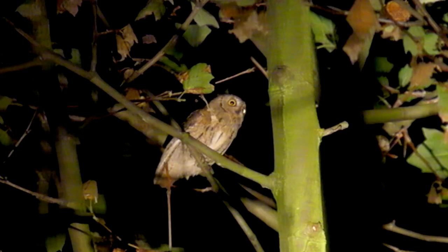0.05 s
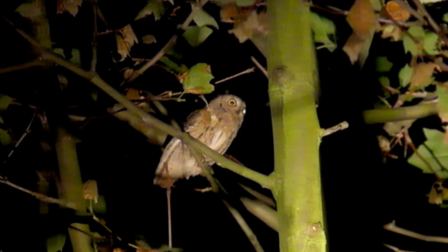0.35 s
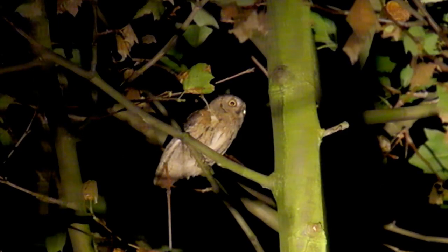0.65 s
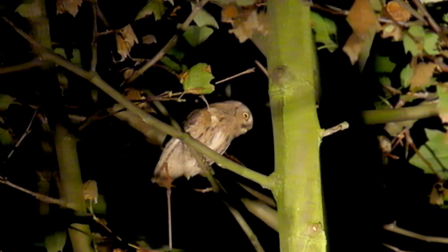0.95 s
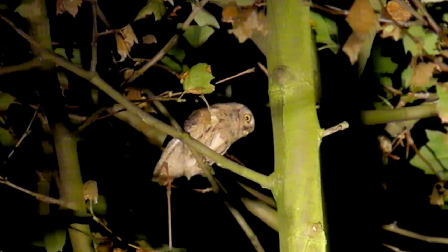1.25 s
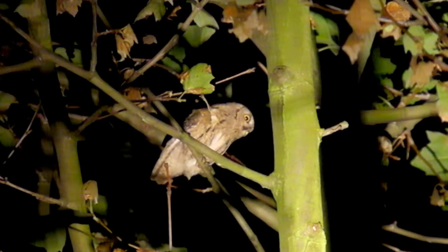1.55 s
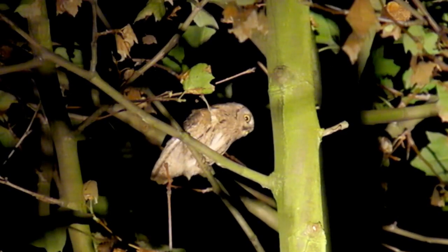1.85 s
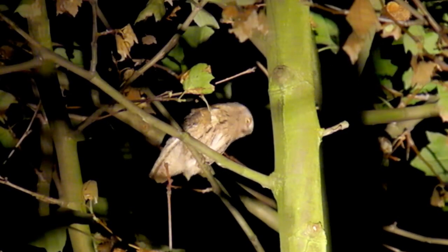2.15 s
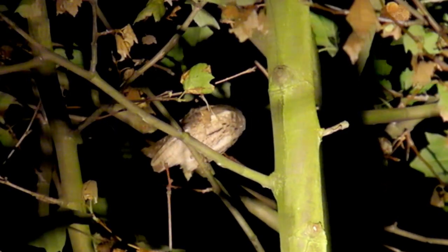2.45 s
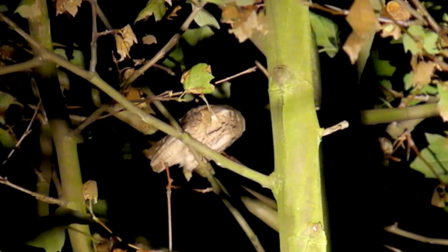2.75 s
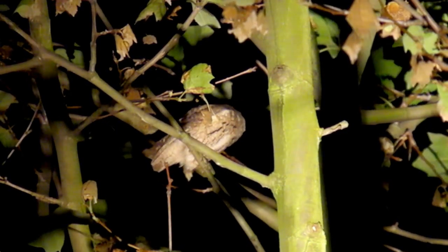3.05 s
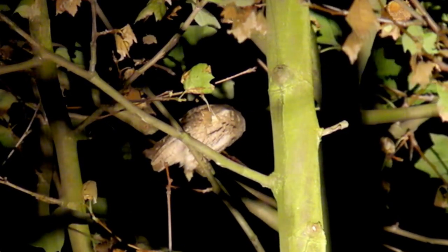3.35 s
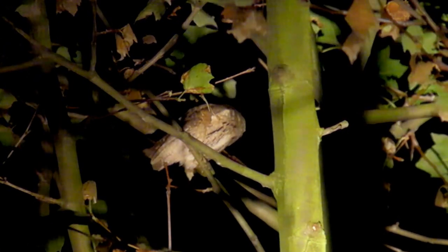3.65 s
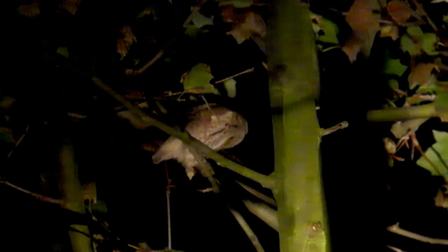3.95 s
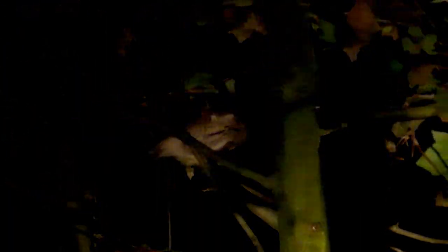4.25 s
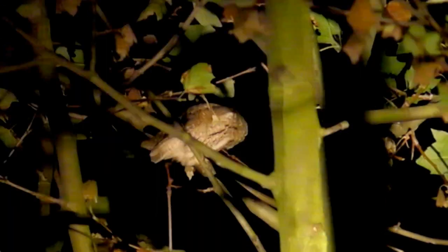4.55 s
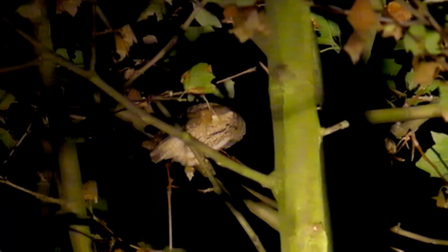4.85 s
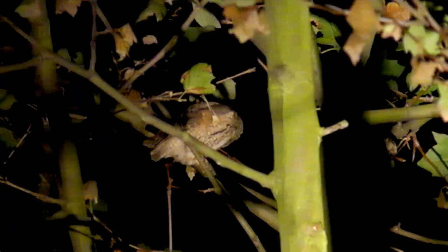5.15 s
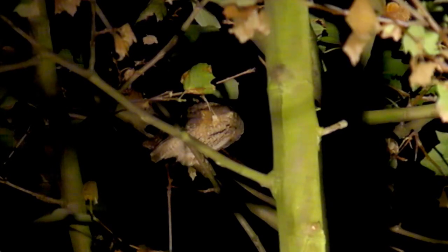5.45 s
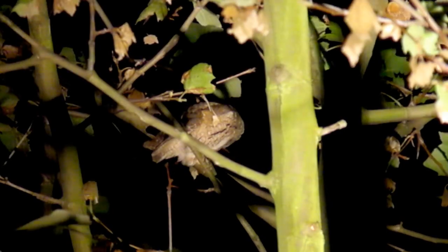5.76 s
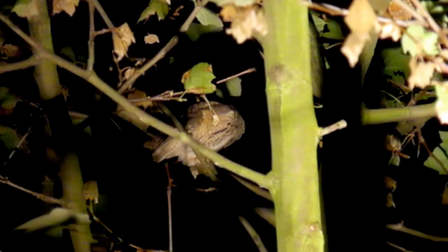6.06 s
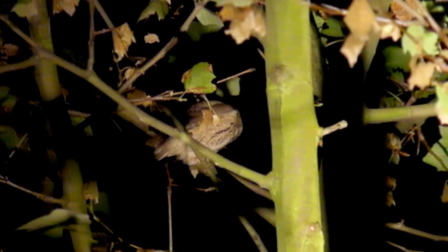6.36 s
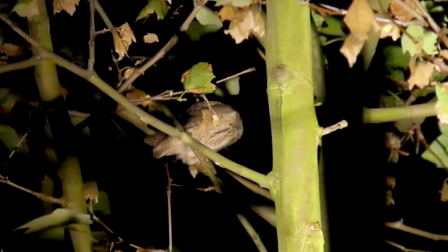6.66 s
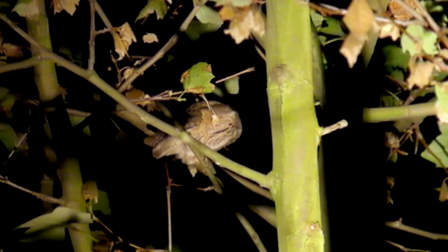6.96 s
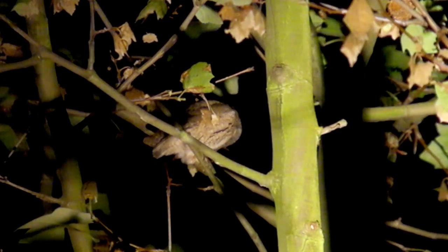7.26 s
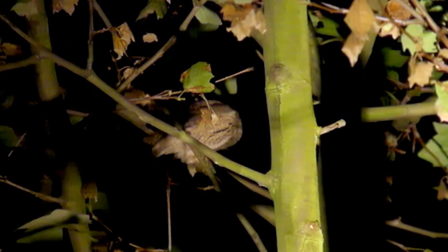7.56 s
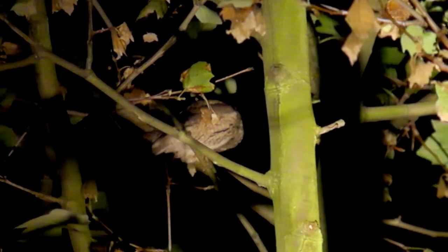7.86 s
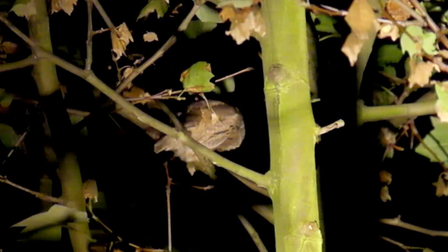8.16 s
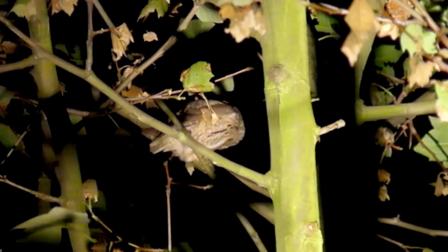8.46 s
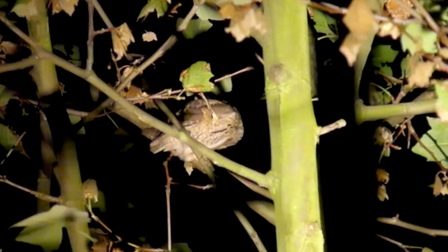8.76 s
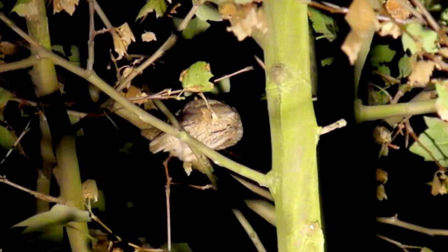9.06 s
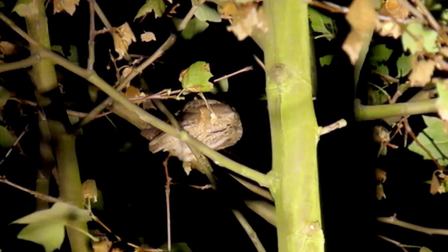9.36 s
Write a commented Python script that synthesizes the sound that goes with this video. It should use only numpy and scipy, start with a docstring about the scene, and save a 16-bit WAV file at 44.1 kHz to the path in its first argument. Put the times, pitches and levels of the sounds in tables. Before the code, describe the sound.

In a wood at night, a nearby owl gives short, level, low whistles, each starting with a quick downward flick. A second owl answers with higher, wavering, rising whistles, and a third calls faintly far off. Crickets pulse softly about twice a second over a distant rush. Dry ticks sound close to the microphone from the middle on, with two sharp snaps in quick succession. A faint high whine enters near the end.

```python
"""Scops owls at night in a wood. Throughout, crickets swell about twice a second over a distant rush.
The near owl opens with the first two of four level whistles, each led by a quick downward flick.
From 2 s a second owl answers with higher, wavering, rising whistles; from 3 s a third calls far off.
Dry ticks come close by from 4.4 s, with two sharp snaps just before 7 s. The owls call on,
and a faint high whine creeps in for the last second."""
import sys
import numpy as np
from scipy import signal
from scipy.fft import rfft, irfft
from scipy.io import wavfile
from scipy.ndimage import uniform_filter1d

SR = 44100
rng = np.random.default_rng(int(sys.argv[2]) if len(sys.argv) > 2 else 0)


def unload_audio(sound):
    """Save the sound as a 16-bit wav file, at the path given as the first command line argument."""
    columns = np.transpose(np.atleast_2d(sound))
    # keep every value between -1 and 1, then stretch to whole-number steps
    steps = np.round(np.clip(columns, -1, 1) * 32767)
    wavfile.write(sys.argv[1], SR, steps.astype(np.int16))


N = 419832
T = np.arange(N) / SR


def undb(db):
    """Decibels to gain."""
    return 10 ** (np.asarray(db) / 20)


def unit(x):
    """Scale to rms 1."""
    return x / np.sqrt(np.mean(x ** 2))


def bump(t, width):
    """Bell curve of height 1 around t = 0."""
    return np.exp(-.5 * (t / width) ** 2)


def step(t, width):
    """Smooth rise from 0 to 1 around t = 0."""
    return .5 + .5 * np.tanh(t / width)


def decay(t, t60):
    """Exponential tail, 60 dB down at t60."""
    return np.exp(-np.log(1000) * t / t60)


def span(start, length, margin_s=.04):
    """The samples of one call with room for its edges, and their time since its start."""
    on = (T >= start - margin_s) & (T <= start + length + margin_s)
    return on, T[on] - start


def walk(rate):
    """Smooth random wander of rms 1 that turns about rate times a second."""
    hold = max(int(SR / rate), 2)
    held = np.repeat(rng.standard_normal(N // hold + 1), hold)
    return unit(uniform_filter1d(uniform_filter1d(held, hold), hold)[:N])


def noise(spectrum):
    """Noise of rms 1, coloured by points of f/Hz, level/dB."""
    hz, db = np.transpose(spectrum)
    f = np.maximum(np.fft.rfftfreq(N, 1 / SR), 1)
    colour = undb(np.interp(np.log(f), np.log(hz), db))
    return unit(irfft(rfft(rng.standard_normal(N)) * colour, N))


def lowpass(x, hz):
    """Gentle second-order roll-off."""
    return signal.sosfilt(signal.butter(2, hz, fs=SR, output="sos"), x)


def whistle(on, hz, strength, overtone_db, waver, flutter_db):
    """A nearly pure tone, slightly unsteady in pitch and level."""
    t = T[on] - T[on][0]
    pitch = hz * (1 + waver * walk(170)[on])
    phase = 2 * np.pi * np.cumsum(pitch) / SR
    # the throat passes the octave only at low pitch, and the note grows purer as it goes on
    throat = 1 / (1 + (pitch / 1330) ** 30)
    octave = throat * undb(overtone_db - 20 * t)
    flutter = undb(flutter_db * walk(90)[on])
    out = np.zeros(N)
    out[on] = np.sqrt(2) * strength * flutter * (np.sin(phase) + octave * np.sin(2 * phase))
    return out


def wood(x, t60, dull_hz):
    """The many small, dull echoes thrown back by trunks and leaves."""
    t = T[:SR]
    echoes = rng.standard_normal(SR) ** 3 * decay(t, t60) * (t > .003)
    echoes = lowpass(echoes, dull_hz)
    return signal.fftconvolve(x, echoes / np.linalg.norm(echoes))[:N]


def night_air():
    """The bed: a distant rush that barely swells, fading into hiss in the treble."""
    # colour of the rush: f/Hz, relative level/dB
    rush_colour = [(30, -33), (60, -22), (120, -15.5), (220, -7.5), (330, -1), (430, 1), (650, -1),
                   (1120, 0.5), (1350, -2.5), (1700, -4), (2300, -11), (3200, -16), (5500, -34),
                   (15600, -48)]
    # level ride of the rush: t/s, level/dB
    rush_ride = [(0, -46.5), (1.1, -46), (4.8, -45), (6.2, -45.5), (8, -45.5), (9.5, -44.5)]
    # colour of the hiss: f/Hz, relative level/dB
    hiss_colour = [(100, -38), (1000, 2), (5500, 0.5), (13000, -3), (15600, -7.5)]
    rush = noise(rush_colour) * undb(np.interp(T, *np.transpose(rush_ride)))
    return rush + undb(-53) * noise(hiss_colour)


def crickets():
    """Many insects blur into one band; they chirp loosely in step, and wing strokes make it shiver."""
    # colour of the chorus: f/Hz, relative level/dB
    band = [(3000, -30.5), (3600, -8.5), (3900, -7), (4150, 1), (4340, 0), (4480, -1), (4620, -7),
            (4740, -15.5), (5300, -32.5)]
    # pace of the chorus: t/s, swell rate/Hz
    pace = [(0, 2.02), (2.9, 2.04), (3.3, 1.89), (6.1, 1.88), (6.5, 2.28), (8.8, 2.28), (9.2, 1.85)]
    first_swell_s, swell_width_s = .15, .09
    tempo = np.interp(T, *np.transpose(pace))
    beats = np.cumsum(tempo) / SR - first_swell_s * tempo[0]
    swell = bump((beats - np.round(beats)) / tempo, swell_width_s)
    # the nearest few sing on almost one pitch
    nearest = noise([(3900, -36), (4150, -11), (4330, -3), (4450, -18), (4700, -41)])
    in_step = swell * unit(noise(band) + undb(5) * nearest) * undb(-49.5 + .66 * walk(45))
    others = noise(band) * undb(-50.5 + .81 * walk(45))
    return in_step + others


def whine():
    """A thin, blurred tone that flutters about ten times a second and creeps upward."""
    # path of the whine: t/s, f/Hz, level before the flutter/dB
    glide = [(8.84, 9640, -64), (9.02, 9800, -62), (9.22, 9900, -64), (9.52, 10170, -64)]
    times, hz, db = np.transpose(glide)
    on = T >= times[0]
    pitch = np.interp(T[on], times, hz)
    strength = undb(np.interp(T[on], times, db))
    tone = whistle(on, pitch, strength, overtone_db=-60, waver=.007, flutter_db=-1)
    flutter = .3 + .58 * np.abs(np.sin(np.pi * 10 * T + .3 * walk(7.2)))
    return flutter * tone * walk(220)


def click(body_db, rise_s, crack_db, crack_t60):
    """A small hard snap: builds for a millisecond, rings a few short modes and sheds a crack of noise."""
    # ring of the snap: f/Hz, relative level/dB, t60/s
    modes = [(895, -8.5, 0.0066), (1654, 3, 0.0071), (2130, -3, 0.0084), (2905, -6.5, 0.0068),
             (3560, -7, 0.006), (4350, -16, .006), (5150, -11, 0.0024), (5630, -10, 0.0041),
             (7050, -3, 0.0071), (7570, -8, 0.0064), (9050, -6.5, 0.0064), (11090, -4.5, 0.0049)]
    t = T[:SR // 20]
    snap = undb(crack_db) * lowpass(rng.standard_normal(len(t)), 8100) * decay(t, crack_t60)
    for hz, db, t60 in modes:
        gain = undb(db + body_db * (hz < 3000))
        snap += gain * np.sin(2 * np.pi * (hz * t + rng.random())) * decay(t, t60)
    snap *= 1 - np.exp(-(t / rise_s) ** 2)
    # so small a thing radiates no bass
    snap = signal.sosfilt(signal.butter(3, 700, "high", fs=SR, output="sos"), snap)
    return snap / np.sqrt(np.mean(snap[:SR // 200] ** 2))


def clicks():
    """Two sharp snaps and some faint ticks, close by, with a brief scatter after each."""
    # click cues: t/s, rms level of the first 5 ms/dB, gain of the modes under 3 kHz/dB
    cues = [(4.4374, -49, -3), (4.7283, -41.5, 10), (5.439, -33.5, -7), (6.339, -44, 0),
            (6.8178, -17.5, 0.5), (6.9188, -18.5, -1.5), (7.3418, -46, -9), (8.4757, -51, -10)]
    out = np.zeros(N)
    for at, db, body_db in cues:
        snap = undb(db) * click(body_db, rise_s=.0014, crack_db=-5, crack_t60=.01)
        start = int(at * SR)
        out[start:start + len(snap)] += snap[:N - start]
    return out + undb(-20.5) * wood(out, t60=.034, dull_hz=2000)


def far_call(start, length, first_hz, last_hz, db):
    """The far owl: a short rising whistle that swells and fades evenly."""
    on, t = span(start, length)
    hz = np.interp(t, [0, length], [first_hz, last_hz])
    swell = undb(db) * bump(t / length - .5, .44)
    return whistle(on, hz, swell, overtone_db=-30, waver=.005, flutter_db=2.5)


def answer(start, length, first_hz, last_hz, crest_at, arch_hz, crest_db, catch_at, catch_db, after_db):
    """The second owl: a rising whistle that arches to a crest, catches, and is pushed on again."""
    arch_s, catch_s, edge_s = .028, .012, .013
    grow_db, sag_db_per_s = 9, 41
    arch_db_per_hz, catch_hz_per_db = .1, 4  # pitch and level lift and slip together
    on, t = span(start, length)
    arch = arch_hz * bump(t - crest_at, arch_s)
    catch = catch_db * bump(t - catch_at, catch_s)
    hz = np.interp(t, [0, length], [first_hz, last_hz]) + arch - catch_hz_per_db * catch
    effort_db = grow_db * np.minimum(t / crest_at - 1, 0) - sag_db_per_s * np.maximum(t - crest_at, 0)
    before = crest_db + effort_db + arch_db_per_hz * (arch - arch_hz)
    after = after_db - sag_db_per_s * (t - catch_at)
    db = before + (after - before) * step(t - catch_at, catch_s) - catch
    edges = step(t, edge_s) * step(length - t, edge_s)
    return whistle(on, hz, undb(db) * edges, overtone_db=-8, waver=.0096, flutter_db=.64)


def near_call(start, length, flick_hz, note_hz, accent_at, accent_db, note_db,
              dip_at, dip_db, overtone_db, lift_hz):
    """The near owl: an accented downward flick lands on a level note that dips, swells and stops."""
    drop_s, undershoot_hz, settle_s, lift_s = .0045, 16, .044, .011
    accent_s, attack_s, release_s = .0062, .0044, .0065
    on, t = span(start, length)
    held_hz = note_hz - undershoot_hz * bump(t, settle_s) + lift_hz * bump(t - length, lift_s)
    hz = flick_hz + (held_hz - flick_hz) * step(t, drop_s)
    dip = dip_db * bump(t / dip_at - 1, .51)  # a later dip is wider
    note = undb(note_db - dip) * step(t - accent_at, attack_s) * step(length - t, release_s)
    accent = undb(accent_db) / np.cosh((t - accent_at) / accent_s)
    return whistle(on, hz, np.hypot(note, accent), overtone_db, waver=.0035, flutter_db=.64)


def owls():
    """Three birds; the two further off carry more of the wood's echo."""
    # near owl: t/s, length/s, flick/Hz, note/Hz, accent delay/s, accent level/dB, note level/dB,
    # dip delay/s, dip depth/dB, octave ahead of the throat/dB, closing lift/Hz
    near_cues = [(.567, 0.27, 1770, 1276, 0.0016, -34, -39, 0.093, 5.5, -12.5, 115),
                 (1.368, 0.2, 1680, 1249, .001, -29.5, -30.5, 0.076, 7, -14.5, -4),
                 (4.033, 0.22, 1680, 1246, 0.0054, -32, -34.5, .07, 4.5, -24, -7),
                 (8.2, .211, 1540, 1247, 0.0053, -34.5, -38.5, 0.051, 3.5, -23, 0)]
    # second owl: t/s, length/s, first f/Hz, last f/Hz, crest delay/s, pitch arch/Hz, crest level/dB,
    # catch delay/s, catch depth/dB, level after the catch/dB
    answer_cues = [(1.971, .242, 1412, 1415, .128, 122.5, -32.5, .169, 5, -36.5),
                   (3.109, .197, 1338, 1610, 0.0864, 70.5, -33.5, 0.12, 3, -35),
                   (4.295, 0.19, 1305, 1567, .062, 4.5, -38, 0.124, 7.5, -35),
                   (5.555, .198, 1320, 1512, 0.061, -1, -38, .153, 6.5, -39.5),
                   (6.876, 0.167, 1300, 1400, .062, 14, -42, 0.127, 1.5, -44),
                   (8.03, .14, 1330, 1455, 0.085, 45, -38.5, .068, 0, -39),
                   (9.182, .208, 1358, 1496, 0.0913, 74.5, -36.5, 0.138, 7.5, -38.5)]
    # far owl: t/s, length/s, first f/Hz, last f/Hz, level/dB
    far_cues = [(2.92, 0.086, 1630, 1700, -50), (7.59, 0.081, 1630, 1700, -52),
                (8.65, 0.11, 1475, 1500, -51.5)]
    near = sum(near_call(*cue) for cue in near_cues)
    second = sum(answer(*cue) for cue in answer_cues)
    far = sum(far_call(*cue) for cue in far_cues)
    send = undb(-24) * near + undb(-17) * (second + far)
    # the echo fades in and out as its many paths cancel and add
    echo = wood(send, t60=.8, dull_hz=3000) * walk(55)
    return near + second + far + echo


def scene():
    """A mono mix, the same in both channels."""
    mono = owls() + crickets() + whine() + clicks() + night_air()
    return np.array([mono, mono])


def record(dry):
    """A narrow notch in the treble and a steep cut of the very top."""
    notch_hz, top_hz = 7860, 15700
    notched = signal.lfilter(*signal.iirnotch(notch_hz, Q=36, fs=SR), dry)
    return signal.sosfilt(signal.ellip(10, .1, 70, top_hz, fs=SR, output="sos"), notched)


dry = scene()
out = record(dry)
unload_audio(out)
```